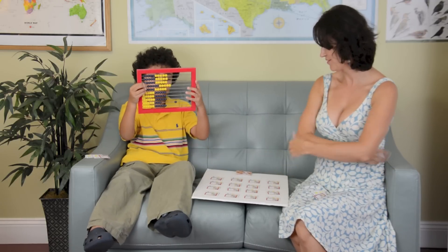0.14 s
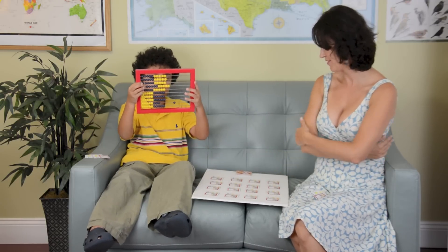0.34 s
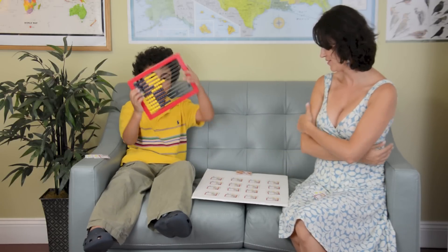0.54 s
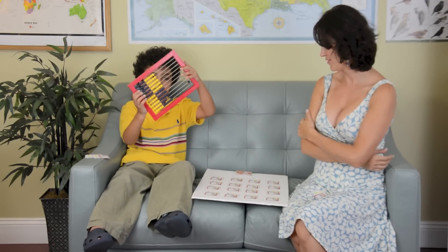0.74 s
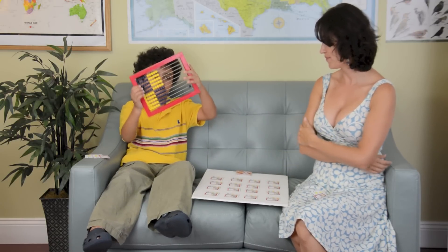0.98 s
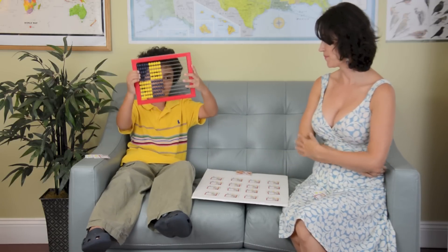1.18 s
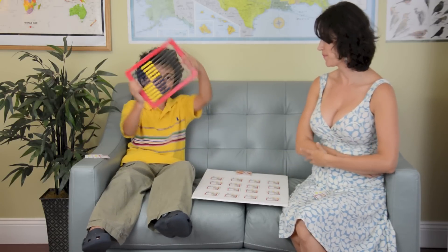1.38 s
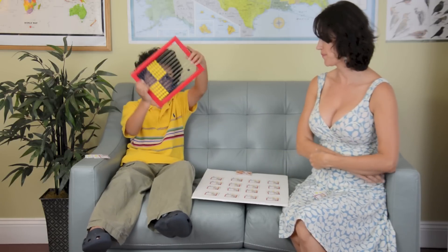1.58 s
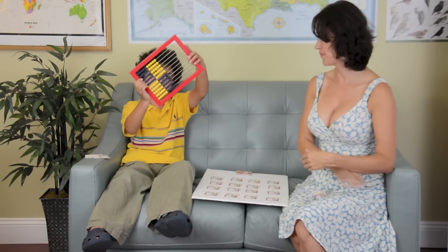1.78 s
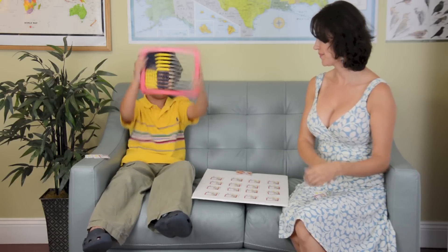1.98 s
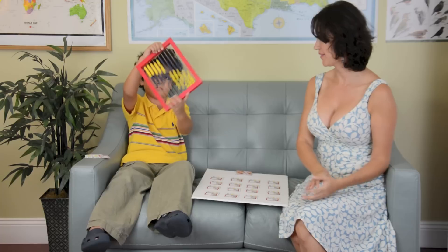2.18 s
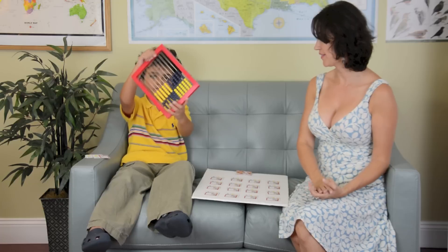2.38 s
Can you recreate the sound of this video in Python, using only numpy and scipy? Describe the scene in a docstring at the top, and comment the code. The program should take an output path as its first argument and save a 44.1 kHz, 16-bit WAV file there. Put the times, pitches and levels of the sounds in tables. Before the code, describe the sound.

Plastic beads rattle on a small handheld abacus. Near-quiet hiss and faint hum come first, then light clicks at 0.4 seconds and a short bright rattle from 0.55 to 0.72, with dull hand taps. Sparse faint clicks follow from 0.8, a sharper clack lands at 1.83, and a loud dense clatter runs from 2.18 to about 2.43, leaving a brief diffuse room echo.

```python
"""Bead frame rattles

A small plastic bead frame is tilted and turned in a living room: rows of beads slide along their rods and
clack together in short rattles, the last a long loud one. Clacks are random clicks through band filters that
also shake the frame resonances; single hard knocks stand out, and a hand taps the frame as decaying sines.
Diffuse echoes ring after each rattle, over shaped-noise microphone hiss, mains hum and thin electrical tones."""
import sys
import numpy as np
from scipy import signal
from scipy.fft import rfft, irfft
from scipy.io import wavfile

SR = 44100
rng = np.random.default_rng(int(sys.argv[2]) if len(sys.argv) > 2 else 0)


def generate_wav(signal):
    """Clip the signal to [-1, 1] and save it as 16-bit WAV at the path in sys.argv[1]."""
    frames = np.transpose(np.atleast_2d(signal))
    scaled = np.clip(frames, -1, 1) * 32767
    pcm = np.round(scaled).astype(np.int16)
    wavfile.write(sys.argv[1], SR, pcm)


N = 107295

# microphone hiss spectrum, relative: pitch_hz, level_db
HISS_SPECTRUM = [(25, -32), (42, -18), (64, -15), (90, -8.5), (130, -12), (300, -7.5), (440, -11.5),
                 (880, -13.5), (2500, -17), (4450, -18), (9000, -19.5), (15800, -21.5)]
# left-right likeness of the hiss: pitch_hz, likeness (-1 to 1)
HISS_LIKENESS = [(60, 0.54), (180, 0.52), (550, 0.48), (1650, 0.5), (4970, 0.36), (15000, 0.5)]
# mains hum and thin tones: pitch_hz, level_db (rms), waver_db
TONES = [(59.7, -58.5, 3), (119.8, -64, -1), (182, -76, 3), (232, -70.5, -3), (901, -65.5, 3.5),
         (2570, -64, 4), (15700, -74, 2.5)]
# echo decay: pitch_hz, t60_s
ROOM_T60 = [(500, 0.44), (2000, 0.49), (5000, 0.58), (9000, 0.55), (14000, 0.27)]
# left-right likeness of the echoes: pitch_hz, likeness (-1 to 1)
ROOM_LIKENESS = [(500, 0.83), (2000, 0.64), (4000, 0.61), (7000, 0.4), (12000, -0.32)]
# dull taps of a hand on the frame: start_s, peak_db, pitch_hz
TAPS = [(0.590, -44, 584), (0.644, -41, 510), (2.06, -43, 950), (2.345, -43, 975), (2.352, -38, 670)]
# rows of beads slide and pile up:
# start_s, swell_s, hold_s, level_db, tilt_db_per_octave, bass_db, peak_hz
SLIDES = [(0.397, 0.0025, 0.008, -44, 0.5, -14, 6300), (0.538, .025, 0.021, -43, -2, -5, 4230),
          (0.561, .026, 0.025, -31, -1.5, -7, 3320), (0.617, .003, 0.029, -35.5, 0.5, 7.5, 3030),
          (0.682, 0.0054, 0.014, -24.5, 0.4, -8, 4200), (0.7, .003, 0.018, -40, 2, -6, 4300),
          (0.794, .004, 0.014, -44, 2.5, -6, 4500), (0.829, .004, 0.015, -47, -2, -6, 5000),
          (1.039, 0.0034, 0.012, -49, -2.5, 1, 3670), (1.219, 0.0033, 0.019, -49.5, 0.5, -3, 6530),
          (1.292, .004, 0.02, -47.5, -1.7, -4, 4540), (1.376, .004, .01, -48.5, -5.5, -2, 3300),
          (1.403, 0.0028, 0.021, -40, -0.5, 10, 3470), (1.435, 0.0092, 0.035, -38.5, -2, 5.5, 5630),
          (1.52, .004, .012, -48, -7, -6, 5000), (1.569, 0.0038, 0.012, -41, -4.5, -8, 4330),
          (1.649, 0.0033, 0.02, -42, -2.8, 4, 7150), (1.829, 0.0042, 0.0087, -34, 2, 4, 4750),
          (1.956, 0.0041, 0.02, -42, -3, 1, 3800), (2.02, 0.032, 0.0038, -34, 0, 7.5, 3230),
          (2.051, 0.0045, 0.049, -35, -2, -1.5, 3000), (2.131, .004, 0.013, -50, -9, 4.5, 2700),
          (2.182, 0.0016, 0.028, -17.5, -0.7, -5, 3860), (2.228, 0.0024, 0.024, -21, 1.2, 1.5, 4400),
          (2.258, 0.0026, 0.042, -16.5, 0, -5.5, 3870), (2.319, 0.0021, 0.044, -17, 0, -3.5, 3980),
          (2.383, 0.0045, 0.049, -26, 2.5, -2, 3180)]
# single hard knocks: start_s, level_db (before KNOCK_OFFSET_DB)
KNOCKS = [(0.6873, -12), (0.7054, -18), (1.4067, -30), (1.8372, -18), (1.9639, -35), (2.0537, -23),
          (2.1834, -8), (2.2634, -10), (2.2724, -3), (2.2884, 3), (2.3004, -5), (2.3294, -9), (2.3604, -4)]
# colour of the clacks: pitch_hz, level_db
CLACK_COLOUR = [(290, -61), (500, -38.5), (923, -12.5), (1730, -7), (2560, -1.5), (3380, -1.5),
                (4050, -1.5), (5820, -2), (10400, -1), (12000, -2.5), (14000, -1)]
# resonances of frame and rods, relative: pitch_hz, width_hz, level_db
FRAME_MODES = [(2680, 450, -2.5), (3084, 450, -7.5), (3515, 59, -5.5), (3970, 450, -0.5), (4400, 65, -6),
               (6850, 280, 1.5), (8100, 300, -6)]

HISS_RMS_DB = -49
ROOM_DB, FIRST_ECHO_S = -1.5, .004
TURN_RATE_HZ = 3.0  # cycle rate of the changing echoes
PAN_DB, RIGHT_LAG_S = .4, 3.2e-5  # left raised and right lowered by PAN_DB
TAP_T60_S = .035
SETTLE_DB_PER_S = 900  # decay after the hold
CLACKS_PER_S, UNEVEN_DB = 3500, 2.5
KNOCK_OFFSET_DB = -5.5
CLACK_SHARPNESS = 6.5  # pitch over bandwidth
PEAK_DB, PEAK_OCTAVES = 5.0, .14  # lift around the strongest pitch
BASS_HZ = 1520  # extra bass lies below this
FRAME_DB = -7
CUTOFF_HZ = 15740


def from_db(db):
    """Decibels to gain."""
    return 10 ** (np.asarray(db) / 20)


def rms_one(x):
    """Scale to unit rms."""
    return x / np.sqrt(np.mean(x ** 2) + 1e-20)


def at_hz(points, hz):
    """Read a table on a log-frequency axis."""
    pitch_hz, value = np.array(points).T
    return np.interp(np.log(hz), np.log(pitch_hz), value)


def ring(clicks, hz, t60_s):
    """Two-pole resonator: a unit click starts a decaying sine of initial height 1."""
    radius = from_db(-60 / (t60_s * SR))
    angle = 2 * np.pi * hz / SR
    poles = [1, -2 * radius * np.cos(angle), radius * radius]
    return signal.lfilter([0, np.sin(angle)], poles, clicks + 1e-18)


def band_pass(x, order, low_hz, high_hz):
    """Butterworth band filter."""
    sos = signal.butter(order, [low_hz, high_hz], "band", fs=SR, output="sos")
    return signal.sosfilt(sos, x)


def stereo_noise(size, likeness):
    """Spectrum of white stereo noise; the mid-side mix sets how alike the sides are at each pitch."""
    hz = np.maximum(np.fft.rfftfreq(size, 1 / SR), 1)
    mid, side = rfft(rng.standard_normal((2, size)))
    alike = np.clip(at_hz(likeness, hz), -1, 1)
    common = np.sqrt((1 + alike) / 2) * mid
    opposed = np.sqrt((1 - alike) / 2) * side * np.array([[1], [-1]])
    return hz, common + opposed


def hiss():
    """Steady microphone hiss: stereo noise shaped in the spectrum."""
    hz, noise = stereo_noise(N, HISS_LIKENESS)
    shaped = irfft(noise * from_db(at_hz(HISS_SPECTRUM, hz)), N)
    return from_db(HISS_RMS_DB) * rms_one(shaped)


def hum_and_tones():
    """Mains hum and thin tones: sines whose levels waver at random."""
    t = np.arange(N) / SR
    out = np.zeros(N)
    for hz, db, waver_db in TONES:
        waver = np.interp(t, np.linspace(0, t[-1], 40), rng.standard_normal(40))
        level = np.sqrt(2) * from_db(db + waver_db * waver)
        out += level * np.sin(2 * np.pi * (hz * t + rng.random()))
    return out


def echoes():
    """One diffuse stereo tail of noise dying band by band; mean energy per side 1."""
    hz, noise = stereo_noise(SR, ROOM_LIKENESS)
    t = np.arange(SR) / SR
    tail = np.zeros((2, SR))
    for centre_hz in 250 * 2 ** np.arange(0, 7.0):
        band = np.clip(1 - np.abs(np.log2(hz / centre_hz)), 0, 1)
        decay = from_db(-60 * t / at_hz(ROOM_T60, centre_hz))
        tail += irfft(noise * band, SR) * decay
    tail *= t > FIRST_ECHO_S
    return tail / np.sqrt(np.mean(np.sum(tail ** 2, axis=1)))


def room(x):
    """Direct sound, later on the right, plus echoes that blend between two aims of the turning frame."""
    aim = 2 * np.pi * TURN_RATE_HZ * np.arange(N) / SR
    wet = np.zeros((2, N))
    for share in (np.cos(aim), np.sin(aim)):
        wet += signal.fftconvolve((x * share)[None], echoes(), axes=1)[:, :N]
    lag = np.exp(-2j * np.pi * np.fft.rfftfreq(N, 1 / SR) * RIGHT_LAG_S)
    late = irfft(rfft(x) * lag, N)
    direct = np.array([x * from_db(PAN_DB), late * from_db(-PAN_DB)])
    return direct + from_db(ROOM_DB) * wet


def hand_taps():
    """Short dull knocks: each click rings one damped sine."""
    out = np.zeros(N)
    for start_s, db, hz in TAPS:
        click = np.zeros(N)
        click[int(start_s * SR)] = from_db(db)
        out += ring(click, hz, TAP_T60_S)
    return out


def slide_motion():
    """Slides swell, hold and settle: summed power and power-weighted tilt, bass and log2 peak pitch."""
    t = np.arange(N) / SR
    power, colour = np.full(N, 1e-14), np.zeros((3, N))
    for start_s, swell_s, hold_s, db, tilt, bass_db, peak_hz in SLIDES:
        since = t - start_s
        rise = np.clip(since / swell_s, 0, 1) ** 2
        settle_db = SETTLE_DB_PER_S * np.maximum(since - swell_s - hold_s, 0)
        shape = rise * from_db(db - settle_db)
        power += shape ** 2
        colour += np.outer([tilt, bass_db, np.log2(peak_hz)], shape ** 2)
    return power, colour / power


def bead_strikes(power, knock_at):
    """Random clicks of uneven size follow the slide power; hard knocks are set on top."""
    size_db = UNEVEN_DB * np.minimum(rng.exponential(1, N), 3.0)
    sizes = from_db(size_db) * rng.choice([-1, 1], N)
    struck = rng.random(N) < CLACKS_PER_S / SR
    strikes = rms_one(sizes * struck) * np.sqrt(power)
    strikes[knock_at] = from_db(np.array(KNOCKS)[:, 1] + KNOCK_OFFSET_DB)
    return strikes


def bead_clacks(strikes, knock_at, colour):
    """Each clack briefly rings six of 42 pitches, a hard knock all of them, through band filters."""
    tilt, bass_db, peak_octave = colour
    group, hit = rng.integers(0, 7, N), np.flatnonzero(strikes)
    half = 1 + .5 / CLACK_SHARPNESS
    out = np.zeros(N)
    for k, hz in enumerate(np.geomspace(600, 12500, 42)):
        own = np.union1d(hit[group[hit] == k % 7], knock_at)
        db = at_hz(CLACK_COLOUR, hz) + tilt[own] * np.log2(hz / 4000)
        db += bass_db[own] / (1 + (hz / BASS_HZ) ** 4)
        db += PEAK_DB * np.exp(-.5 * ((np.log2(hz) - peak_octave[own]) / PEAK_OCTAVES) ** 2)
        clicks = np.full(N, 1e-18)
        clicks[own] = strikes[own] * from_db(db)
        out += 3 * band_pass(clicks, 2, hz / half, hz * half)
    return out


def frame_ring(strikes):
    """Every strike shakes the frame and rod resonances by random amounts."""
    out = np.zeros(N)
    for hz, width_hz, db in FRAME_MODES:
        t60_s = np.log(1000) / (np.pi * width_hz)
        level = from_db(FRAME_DB + db) * np.sqrt(width_hz / 500) / 8
        out += level * ring(strikes * rng.standard_normal(N), hz, t60_s)
    return out


def beads():
    """Sliding beads strike one another; clacks and frame ring together within one band."""
    power, colour = slide_motion()
    knock_at = (np.array(KNOCKS)[:, 0] * SR).astype(int)
    strikes = bead_strikes(power, knock_at)
    rattle = bead_clacks(strikes, knock_at, colour) + frame_ring(strikes)
    return band_pass(rattle, 5, 600, 12400)


def scene():
    """The frame in the room over hiss, hum and tones."""
    return hiss() + hum_and_tones() + room(hand_taps() + beads())


def record(dry):
    """A steep elliptic low-pass cuts the top."""
    sos = signal.ellip(12, .5, 70, CUTOFF_HZ, fs=SR, output="sos")
    return signal.sosfilt(sos, dry)


dry = scene()
out = record(dry)
generate_wav(out)
```